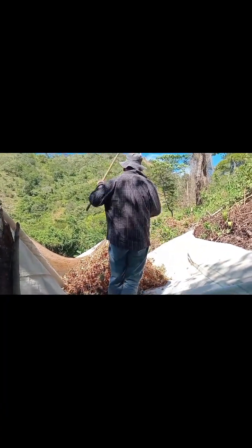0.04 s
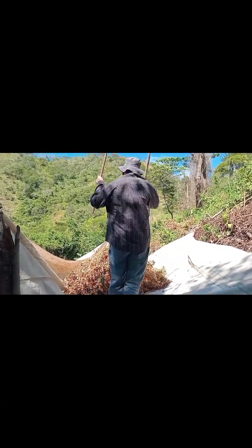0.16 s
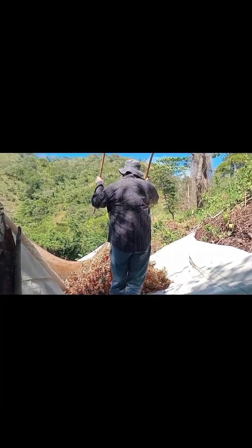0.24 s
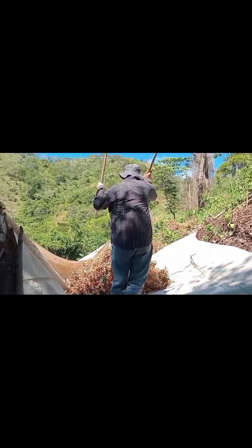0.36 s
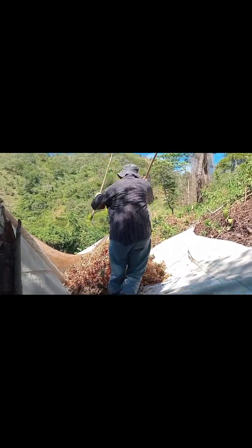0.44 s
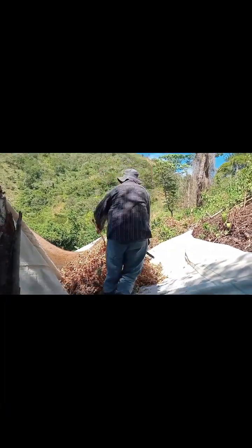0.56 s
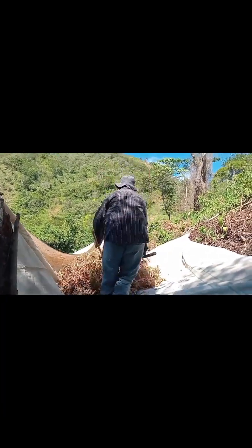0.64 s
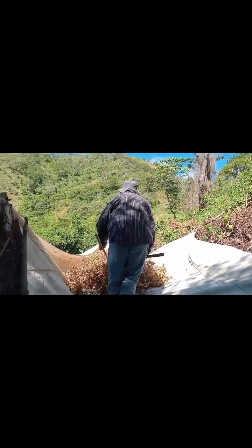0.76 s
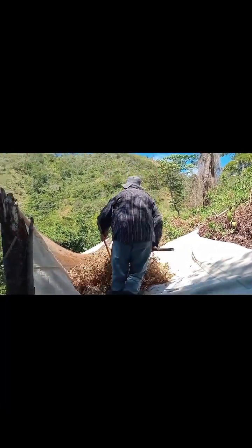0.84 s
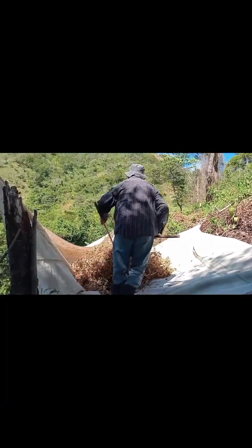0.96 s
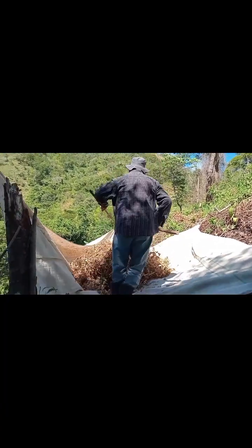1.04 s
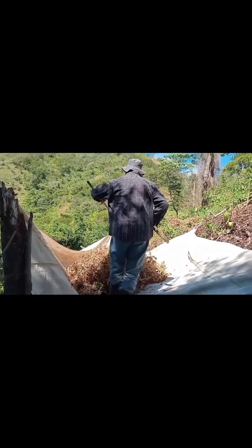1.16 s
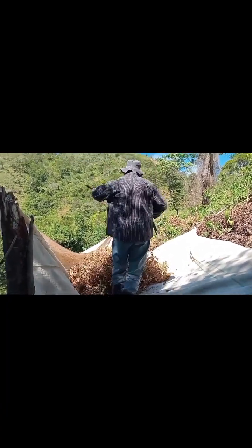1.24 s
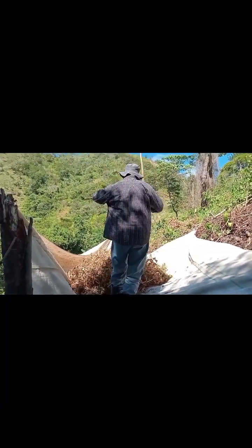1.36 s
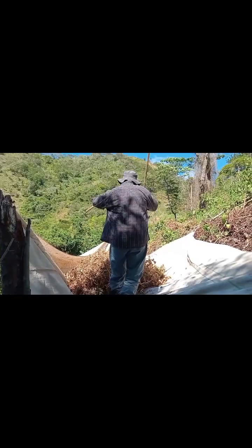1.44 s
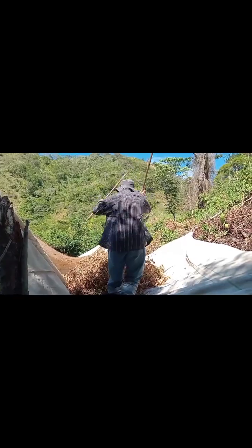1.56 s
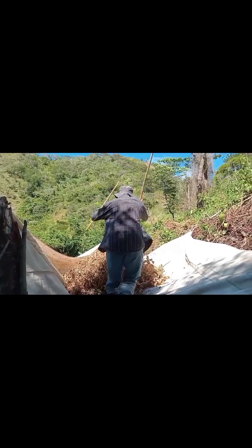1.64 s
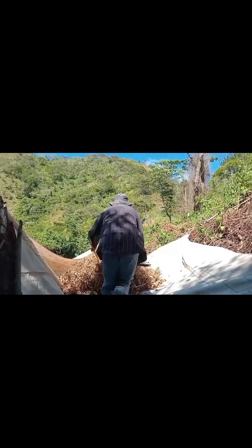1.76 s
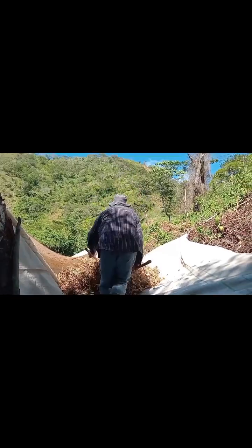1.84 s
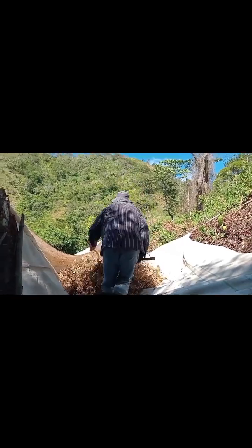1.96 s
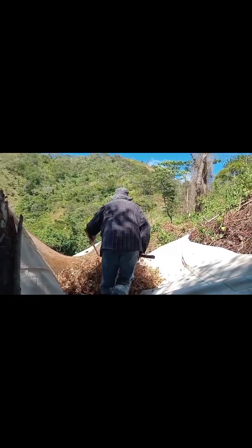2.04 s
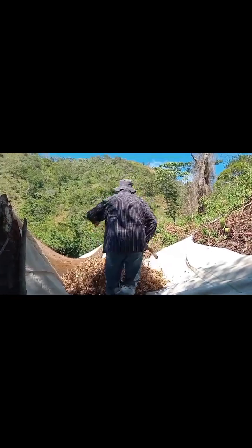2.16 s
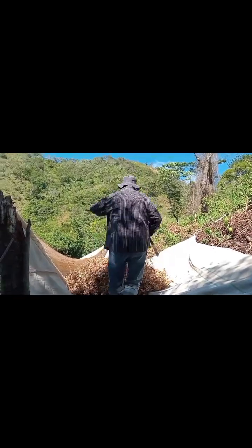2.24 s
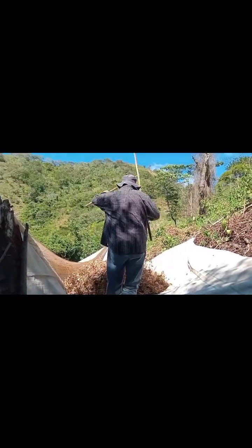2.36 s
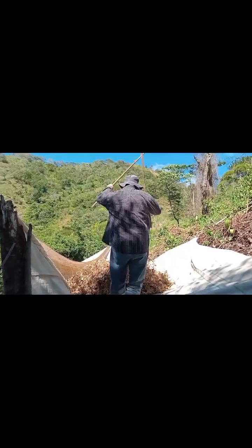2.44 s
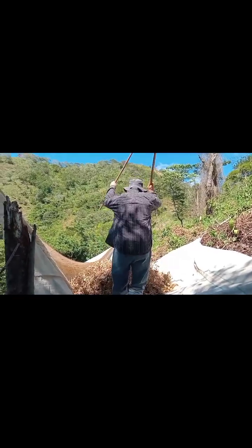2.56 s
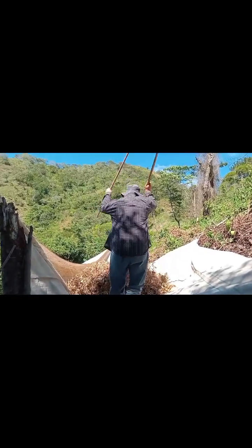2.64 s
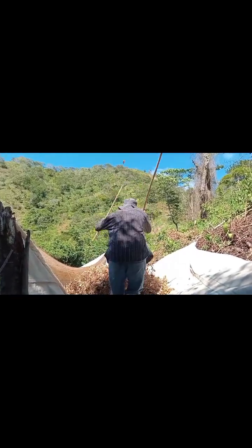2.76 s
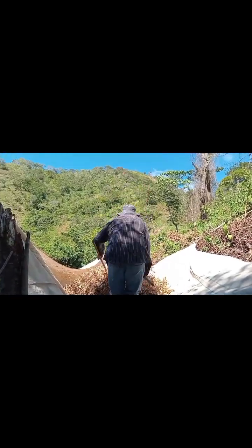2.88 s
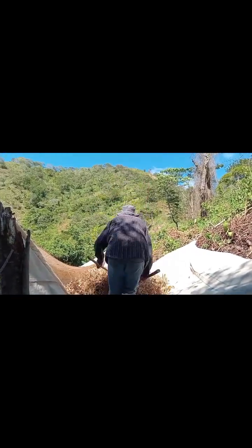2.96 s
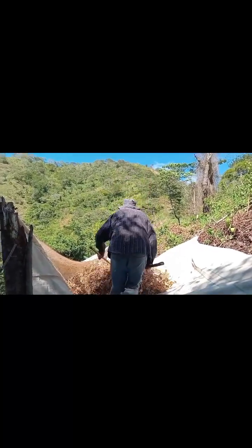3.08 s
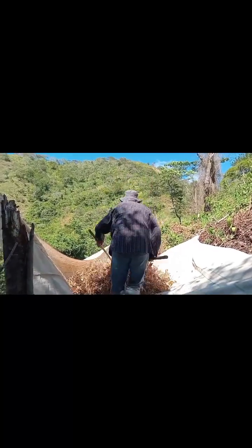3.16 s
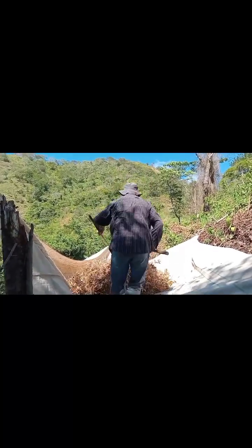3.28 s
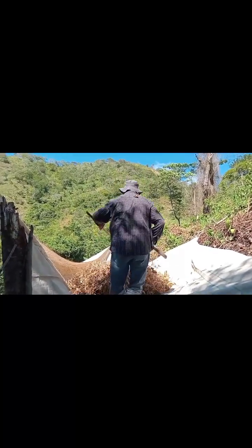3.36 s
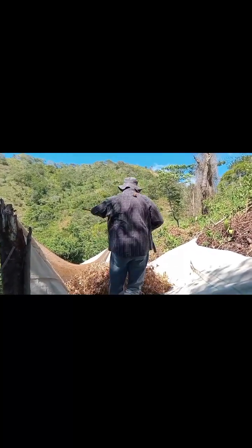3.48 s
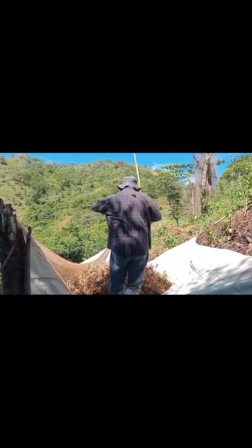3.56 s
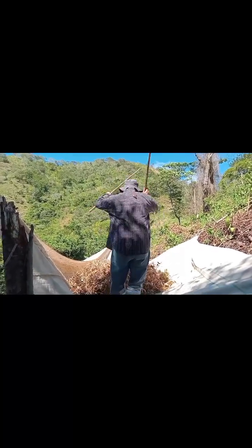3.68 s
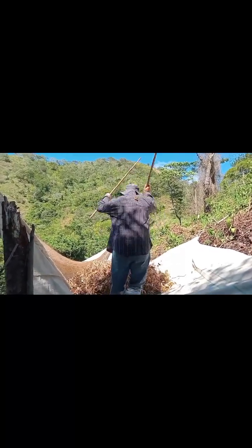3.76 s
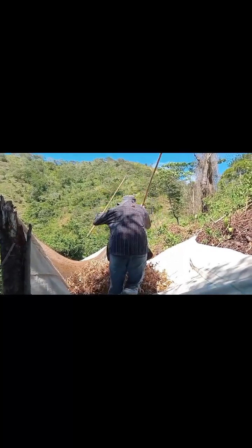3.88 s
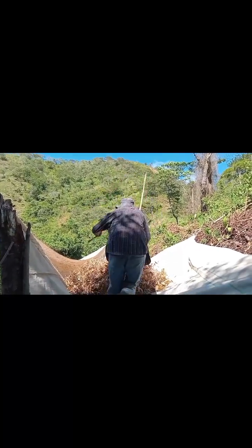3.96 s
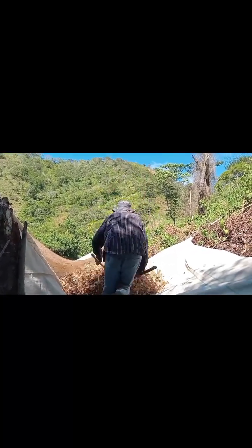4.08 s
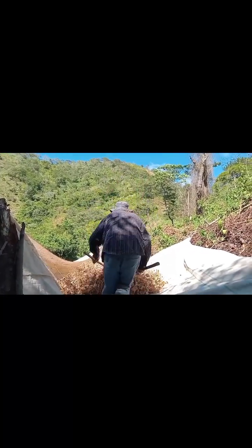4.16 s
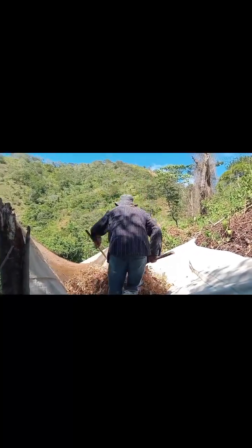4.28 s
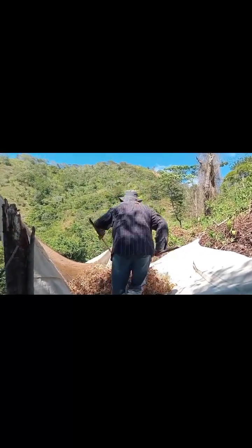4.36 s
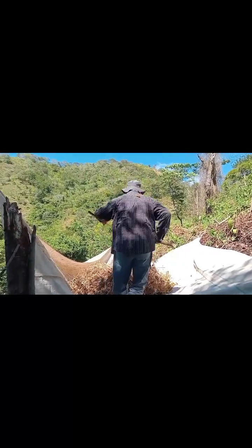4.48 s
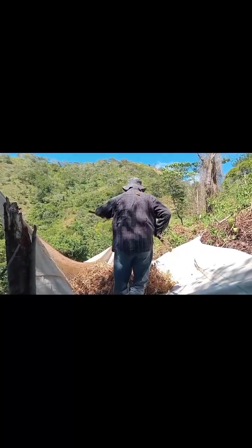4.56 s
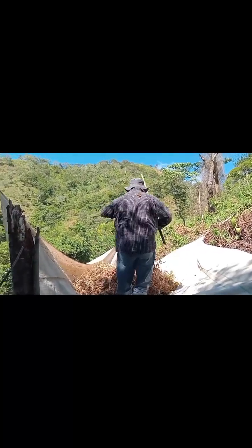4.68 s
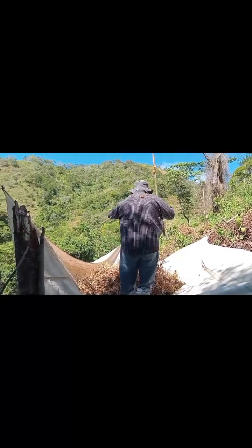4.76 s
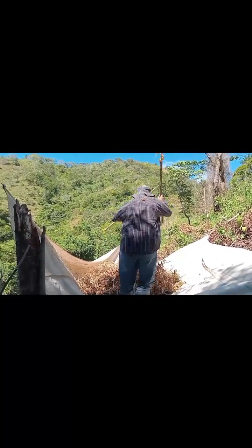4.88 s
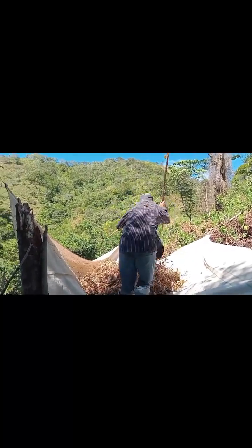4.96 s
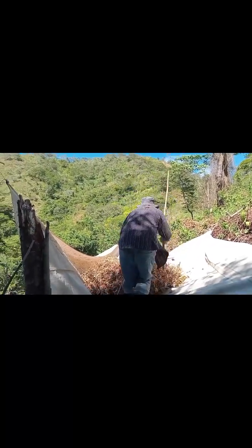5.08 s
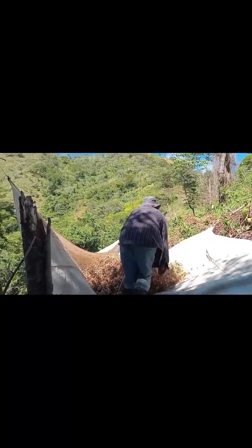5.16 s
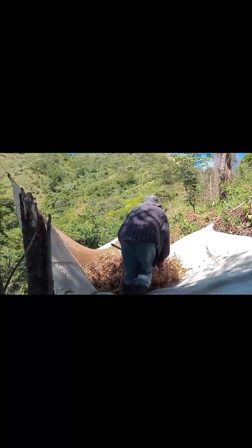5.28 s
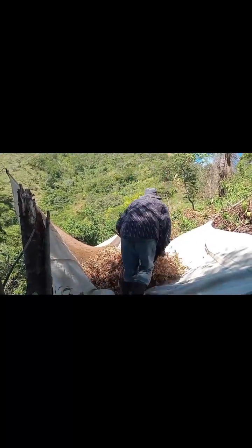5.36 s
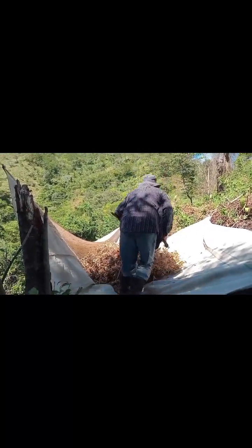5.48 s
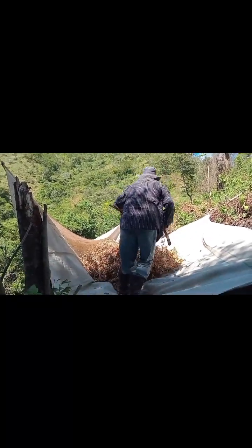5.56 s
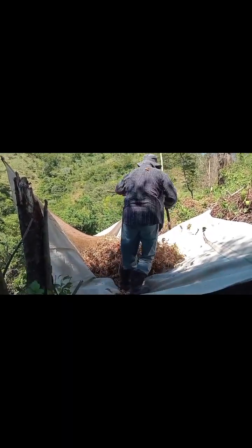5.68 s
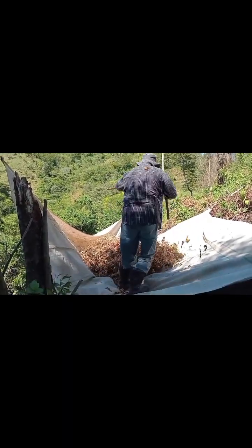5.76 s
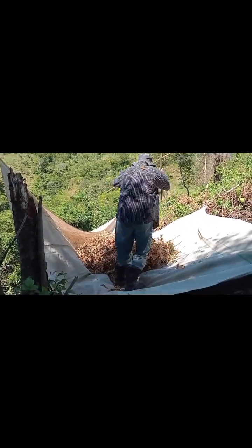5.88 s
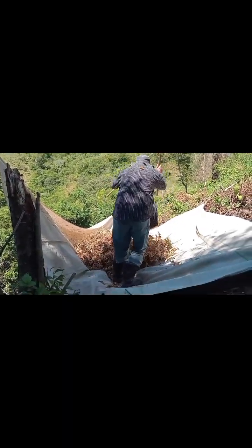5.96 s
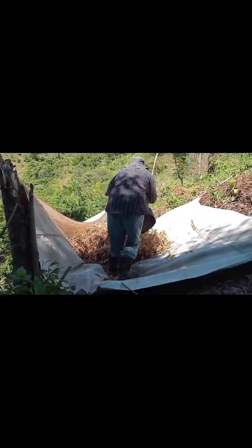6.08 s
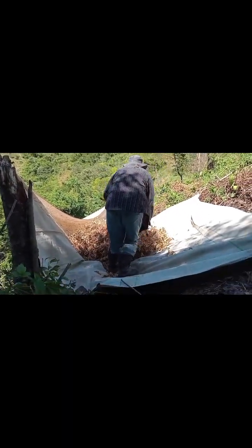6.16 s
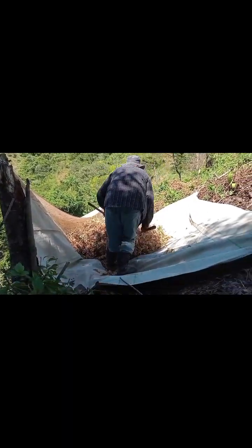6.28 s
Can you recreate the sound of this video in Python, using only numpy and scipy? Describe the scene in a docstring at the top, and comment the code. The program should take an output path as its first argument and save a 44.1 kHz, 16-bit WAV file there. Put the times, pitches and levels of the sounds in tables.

```python
"""A hillside outdoors: sticks thresh a pile of dry plants on a plastic tarp, heard by one microphone.
Each stroke swishes as a gliding tone, then lands as one to three close blows of shaped noise over damped thuds.
Pods and seeds crackle on down the sheet as coloured grains, with rustles, knocks, taps and short noise snaps.
A cricket trills steadily, a gliding tone cut into chirps with a faint echo, over softly swelling air noise."""
import sys
import numpy as np
from scipy import signal
from scipy.fft import rfft, irfft, next_fast_len
from scipy.io import wavfile
from scipy.ndimage import uniform_filter1d

SR = 44100
rng = np.random.default_rng(int(sys.argv[2]) if len(sys.argv) > 2 else 0)


def file_out(sig):
    """Save sig as 16-bit WAV at sys.argv[1]."""
    # one column per channel
    cols = np.atleast_2d(sig).T
    # limit, then scale
    lim = np.clip(cols, -1, 1)
    pcm = np.round(lim * 32767).astype(np.int16)
    wavfile.write(sys.argv[1], SR, pcm)


N = 278700  # length in samples

# colour of breaking stems and pods, relative: pitch_hz [Hz], level_db [dB per Hz]
CRACKLE_COLOUR = [(290, -52), (500, -14), (595, -37.5), (689, -10.5), (935, -7.5), (2140, 1.5), (3320, -6),
                  (3780, -3), (4630, -6), (6670, 2), (7280, -1), (8920, 4.5), (12500, -5), (15100, -8.5),
                  (16200, -26)]
# colour of the last fine seeds, relative: pitch_hz [Hz], level_db [dB per Hz]
TRICKLE_COLOUR = [(1880, -35.5), (3200, -23), (3420, -28), (3790, 4), (5450, -19.5), (9340, 3.5),
                  (12600, -17.5), (14100, -23.5), (16000, -24)]
# colour of the flapping tarp, relative: pitch_hz [Hz], level_db [dB per Hz]
FLAP_COLOUR = [(40, -6.5), (90, -3.5), (250, 3), (420, -0.5), (600, -12.5), (900, -18.5), (1500, -39.5)]
# stick landings: peak_s [s], crash_db [dB], rise_ms [ms], fall_ms [ms], stems_db [dB above the crash],
# thud_db [dB], thud_hz [Hz]
LANDINGS = [(0.555, -49, 5.2, 18, 4, -56, 170), (0.5722, -23.5, 18, 4.8, -9, -28, 170),
            (1.738, -27.5, 13.4, 8.7, -10, -49, 167.4), (1.7501, -21, 13.7, 6.5, -1, -21.5, 300),
            (2.847, -27, 1.8, 17, -4.5, -27, 148), (2.855, -27.5, 7.1, 9.6, -27, -36, 148.4),
            (2.8771, -18.5, 12.5, 10.4, -6.5, -17, 91.7), (3.935, -38, 8.2, 11, -14, -51.5, 250),
            (3.982, -25, 8, 9.6, -14, -33, 170), (3.9983, -20, 13, 14.5, -3.5, -17, 190),
            (5.1052, -20, 5.7, 4.2, -15.5, -40, 199), (5.118, -20.5, 11, 13, -9, -25, 130),
            (6.1448, -19.5, 11.6, 5.4, -10, -26.5, 151)]


def pile():
    """Dry plants: many small breaks crackle, scrape and rattle, blows blur into noise, and the tarp flaps."""
    level_db, pods_db, stems_db, flap_db = stirring()
    busy = np.clip((level_db + 69) / 18, 0, 1)  # as the pile settles only fine seeds keep running
    few = np.clip((-38 - level_db) / 20, 0, 1)  # few movers are patchy, many average out

    # stirred pile: dense breaks, plus single seeds heard apart once the pile calms
    ticks = evened(grains(70, 3, 0.02, count=9))
    breaks = evened(grains(5000, 0.42, 0.22, count=9)) + 0.5 * few * ticks
    breaks = patchy(breaks, 0.8 + 2.8 * few, 2, 16)
    stems, pods, crackle = thirds(coloured(breaks, CRACKLE_COLOUR))
    fine_seeds = thirds(coloured(breaks, TRICKLE_COLOUR))[2]
    crackle = busy * crackle + (1 - busy) * fine_seeds
    stems = (1 - few) * stems + few * hollow(stems)
    pods = (1 - few) * pods + few * hollow(pods)
    clumps = gain_of(0.7 * wander(5) + 1.3 * few * wander(30))  # seeds slide in bunches
    debris = crackle + pods * gain_of(pods_db) + stems * gain_of(stems_db)
    out = clumps * gain_of(level_db) * debris

    # blows: countless breaks at once blur into noise
    dense = coloured(patchy(rng.standard_normal(N), 0.63, 4.3, 3.6), CRACKLE_COLOUR)
    stems, pods, crackle = thirds(dense * gain_of(1.6 * wander(0.4)))
    for peak_s, crash_db, rise_ms, fall_ms, low_db, _, _ in LANDINGS:
        out += (crackle + 0.58 * pods) * crash(peak_s, crash_db, rise_ms, fall_ms)
        out += stems * crash(peak_s, crash_db + low_db, rise_ms, 1.14 * fall_ms)

    flap = coloured(patchy(rng.standard_normal(N), 3.5, 1, 8), FLAP_COLOUR)
    return out + flap * gain_of(level_db + flap_db + 1.8 * wander(20))


def crash(peak_s, db, rise_ms, fall_ms):
    """Amplitude of a landing: stems give way one after another from first touch, then settle."""
    ms = (np.arange(N) / SR - peak_s) * 1000
    rise = np.clip(1 + ms / rise_ms, 0, 1) ** 2.12
    fall = np.exp(-np.abs(ms) / fall_ms)
    return gain_of(db) * np.where(ms < 0, rise, fall)


# what each stroke sets moving: start_s [s], burst_db [dB], slide_db [dB], slide_fade [dB/s],
# slide_length_s [s], trickle_db [dB], pods_db and stems_db [dB above the crackle],
# flap_db [dB], flap_fade [dB/s]
STROKES = [(0.5728, -26.5, -35.5, 34.9, 0.53, -53, -9, -9.5, -50, 88),
           (1.7511, -27.5, -36, 43.2, 0.31, -55.5, -7, -9.5, -52, 62),
           (2.8772, -28, -33, 50.4, 0.49, -63.5, -7.5, -9.5, -43, 153),
           (3.9955, -26, -39, 30.03, 0.42, -65, -7, -9.5, -45.5, 92.7),
           (5.117, -27, -39.5, 32.8, 0.34, -67.5, -7, -12.5, -46.5, 132),
           (6.1428, -28.5, -51, 37.8, .4, -64, -5, -10, -48, 125)]
# stalks dragged by stick or foot between strokes: start_s [s], length_s [s],
# crackle_db, pods_db, stems_db, flap_db [dB]
RUSTLES = [(0.45, 0.094, -74, -79, -90, -85), (0.942, 0.098, -60, -61, -61, -76),
           (1.119, 0.12, -58, -68, -58.5, -59.5), (1.236, 0.12, -56, -67.5, -61, -63),
           (1.391, .04, -64.5, -77, -63.5, -60), (1.434, 0.12, -51.5, -65, -62, -66.5),
           (1.654, 0.071, -63, -69, -74, -74), (2.138, 0.076, -57.5, -67, -68, -79),
           (2.325, 0.038, -73, -90, -79, -77), (2.783, 0.016, -59, -77, -63, -82),
           (3.429, 0.014, -49, -52.5, -73, -86), (3.782, 0.012, -78, -80, -83.5, -94),
           (4.316, .09, -50.5, -55, -65, -98), (4.469, 0.027, -53.5, -66, -90, -90),
           (4.697, .025, -65, -80, -90, -101), (5.027, 0.1, -60.5, -89, -73, -63.5),
           (5.414, 0.056, -54, -54.5, -60, -73), (5.642, .09, -75, -83, -87, -78),
           (5.759, 0.067, -61.5, -70, -62.5, -65.5), (5.874, 0.022, -65, -71, -65, -91)]
# the pile at rest: crackle_db, pods_db, stems_db, flap_db [dB]
REST_LEVELS = (-85, -91, -85.5, -82)
# vortices behind the falling stick: start_s [s], end_s [s], first_hz [Hz], last_hz [Hz], level_db [dB]
# (here the stick's wind lifts the sheet; sticks() sounds the swish itself)
SWISHES = [(0.502, 0.562, 97, 186, -42.5), (1.712, 1.747, 140, 180, -35.5), (2.81, 2.87, 127, 190, -32),
           (3.945, 3.985, 150, 184, -38.5), (5.047, 5.099, 211.6, 300, -53), (6.1, 6.138, 165, 206, -40.5)]
HOLD_S = 0.011  # each stroke holds its level this long before fading
BURST_DB_PER_S, STOP_DB_PER_S, TRICKLE_DB_PER_S = 104, 102, 10  # fades
TRICKLE_PODS_DB, TRICKLE_STEMS_DB, TRICKLE_FLAP_DB = -15, -14, -29.5  # above the trickle's crackle
DRAG_RISE_S, DRAG_DB_PER_S = 0.017, 303
SWISH_FLAP_DB = -22.5  # above the swish


def stirring():
    """A stroke starts a burst, a slide that stops and a trickle; drags add short rustles. Powers add."""
    t = np.arange(0, N + 16, 16) / SR  # a level every 16 samples
    power = power_of(REST_LEVELS)[:, None] * np.ones(len(t))  # rows: crackle, pods, stems, flap
    ends = [row[0] for row in STROKES[1:]] + [np.inf]  # each stroke gives way to the next
    for stroke, end_s in zip(STROKES, ends):
        start_s, burst_db, slide_db, slide_fade, slide_length_s = stroke[:5]
        trickle_db, pods_db, stems_db, flap_db, flap_fade = stroke[5:]
        on = (t >= start_s) & (t < end_s)
        u = np.maximum(t[on] - start_s - HOLD_S, 0)
        slide_db = slide_db - slide_fade * np.minimum(u, slide_length_s)
        slide_db = slide_db - STOP_DB_PER_S * np.maximum(u - slide_length_s, 0)
        moving = power_of(burst_db - BURST_DB_PER_S * u) + power_of(slide_db)
        trickle = power_of(trickle_db - TRICKLE_DB_PER_S * u)
        flap = power_of(flap_db - flap_fade * u)
        power[:, on] += [moving + trickle,
                         moving * power_of(pods_db) + trickle * power_of(TRICKLE_PODS_DB),
                         moving * power_of(stems_db) + trickle * power_of(TRICKLE_STEMS_DB),
                         flap + trickle * power_of(TRICKLE_FLAP_DB)]
    for start_s, length_s, *levels_db in RUSTLES:
        rise = np.clip((t - start_s) / DRAG_RISE_S, 0, 1)
        fall = gain_of(-DRAG_DB_PER_S * np.maximum(t - start_s - length_s, 0))
        power += power_of(levels_db)[:, None] * (rise * fall) ** 2
    for start_s, end_s, *_, db in SWISHES:
        lift = np.interp(t, [start_s, end_s, end_s + 0.032], [0, 1, 0])
        power[3] += (gain_of(db + SWISH_FLAP_DB) * lift) ** 2
    level_db = np.array([np.interp(np.arange(N) / SR, t, 10 * np.log10(p)) for p in power])
    return level_db[0], *(level_db[1:] - level_db[0])  # the last three relative to the crackle


# hollow stems and pods that colour the slow sliding, its lows thinned:
# pitch_hz [Hz], width_hz [Hz], level_db [dB]
HOLLOWS = [(740, 380, -5), (1270, 160, 6.5), (2207, 240, 6.5), (3990, 83, 4), (4660, 300, 2.5)]


def hollow(x):
    """Shapes x by the resonances of the hollow stems and pods, at rms 1."""
    hz = np.geomspace(300, 16000, 300)
    db = sum(peak_db * np.exp(-((hz - f) / width) ** 2) for f, width, peak_db in HOLLOWS)
    return coloured(x, np.transpose([hz, db]))


# where the pods' range starts and ends: low_hz, high_hz [Hz]
PODS_RANGE = (2900, 5700)


def thirds(x):
    """Splits into stems, pods and crackle ranges, low to high, each at rms 1."""
    filters = [signal.butter(3, hz, fs=SR, output="sos") for hz in PODS_RANGE]
    below_pods, below_crackle = (signal.sosfiltfilt(sos, x) for sos in filters)
    return evened(below_pods), evened(below_crackle - below_pods), evened(x - below_crackle)


# dull knocks of stick or boot on the sheet: start_s [s], level_db [dB], pitch_hz [Hz]
KNOCKS = [(0.478, -45, 53.7), (.65, -38.5, 705), (0.679, -38, 406), (0.7, -36, 370), (.705, -35, 716),
          (.79, -50.5, 352), (0.928, -49, 390), (1.125, -46, 880), (1.149, -60, 615), (1.19, -44, 225),
          (1.321, -44.5, 337), (1.442, -47.5, 324), (1.509, -47.5, 406), (1.844, -33, 330),
          (1.845, -31.5, 715), (4.041, -35, 211), (5.04, -49, 270)]
# wood touching wood: start_s [s], level_db [dB], tilt_db [dB/octave towards the high modes]
TAPS = [(1.1088, -27.5, 22), (1.129, -33.5, 10), (1.68, -45, 18), (5.039, -30.5, -1.5), (5.768, -46.5, 7)]
# modes of the wooden stick: pitch_hz [Hz], level_db [dB]
STICK_MODES = [(1350, 2), (1820, 0.5), (2250, 2.5)]
GROUND_HZ, GROUND_DB = 64.6, -17  # the ground's push, level above the thud
TAP_CYCLES, TAP_RISE_CYCLES = 2.6, 2.0


def sticks():
    """Falling sticks shed a gliding tone; landings, knocks and taps are short damped swings."""
    out = np.zeros(N)
    for start_s, end_s, first_hz, last_hz, db in SWISHES:
        u = np.linspace(0, 1, round((end_s - start_s) * SR))
        hz = first_hz + (last_hz - first_hz) * u
        turns = np.cumsum(hz) / SR + rng.random()
        swell = u ** 1.3 * signal.windows.tukey(len(u), 0.4)
        add(out, start_s, gain_of(db) * swell * np.sin(2 * np.pi * turns))
    for peak_s, *_, thud_db, thud_hz in LANDINGS:
        add(out, peak_s - 0.003, ring(thud_hz, thud_db, 0.47))
        add(out, peak_s - 0.001, ring(GROUND_HZ, thud_db + GROUND_DB, 1.0))
    for start_s, db, hz in KNOCKS:
        add(out, start_s, ring(hz, db, 1.45 + hz / 1200))
    for start_s, db, tilt_db in TAPS:
        for hz, mode_db in STICK_MODES:
            tilted_db = db + mode_db + tilt_db * np.log2(hz / STICK_MODES[-1][0])
            add(out, start_s, ring(hz, tilted_db, TAP_CYCLES, TAP_RISE_CYCLES))
    return out


def ring(hz, db, cycles, rise=0.27):
    """A softly started, quickly damped swing; rise and decay are counted in cycles."""
    u = np.arange(int(6 * cycles * SR / hz)) * hz / SR
    start = 1 - np.exp(-(u / rise) ** 1.8)
    return gain_of(db) * start * np.exp(-u / cycles) * np.sin(2 * np.pi * u)


# single pods and stems that snap: start_s [s], level_db [dB], brightest_hz [Hz]
SNAPS = [(0.8948, -35.5, 6200), (0.973, -35, 6700), (1.1101, -39.5, 4340), (1.126, -41.5, 7400),
         (1.214, -48, 8400), (1.254, -42, 9500), (1.339, -48, 8500), (1.466, -36.5, 8900),
         (1.4864, -37.5, 8200), (1.5265, -44, 7850), (1.6727, -41.5, 9600), (1.682, -44, 4530),
         (2.258, -53, 4000), (2.332, -48, 10200), (2.358, -47, 9900), (2.483, -51.5, 10300),
         (2.566, -51, 9600), (2.656, -55, 9250), (2.6857, -61, 9800), (2.7833, -60, 9600),
         (3.3278, -47, 9800), (3.4431, -38, 10100), (3.672, -55.5, 7000), (3.795, -47, 8800),
         (4.2424, -50.5, 9520), (4.2584, -50, 9770), (4.489, -41.5, 7760), (4.632, -58, 8500),
         (4.7069, -48.5, 9340), (4.881, -50, 9900), (5.766, -52.5, 4870), (5.7994, -52, 5200),
         (5.843, -57, 9800), (5.879, -58, 4130), (5.9044, -56.5, 4960), (5.917, -59, 4900),
         (5.919, -59, 9400)]
SNAP_OCTAVES, SNAP_WIDENS_PER_DB = 0.24, 0.07  # harder snaps cover more pitch


def snaps():
    """Each snap is a millisecond noise burst around its brightest pitch, with a short scatter."""
    out = np.zeros(N)
    t = np.arange(800) / SR
    fade = np.exp(-t / 0.0014) + 0.25 * np.exp(-t / 0.008)
    hz_axis = np.fft.rfftfreq(800, 1 / SR) + 1
    for start_s, db, brightest_hz in SNAPS:
        width = SNAP_OCTAVES * np.exp(SNAP_WIDENS_PER_DB * (db + 42))
        octaves = np.log2(hz_axis / brightest_hz) / width
        lopsided = octaves / np.where(octaves > 0, 0.7, 1.3)  # steeper above than below
        burst = rfft(rng.standard_normal(800)) * np.exp(-lopsided ** 2)
        add(out, start_s, gain_of(db) * evened(irfft(burst, 800)) * fade)
    return out


# the trill's pace and strength, marked at every sixth chirp: time_s [s], level_db [dB]
TRILL = [(-0.116, -56), (0.226, -53.5), (0.565, -59), (0.915, -58.5), (1.248, -54.5), (1.584, -54.5),
         (1.925, -52.5), (2.265, -53), (2.615, -52), (2.955, -54.5), (3.297, -51.5), (3.641, -51.5),
         (3.985, -55), (4.336, -52), (4.689, -53), (5.039, -52.5), (5.385, -54), (5.739, -57.5),
         (6.097, -57), (6.454, -60.5)]
WING_HZ = 2672  # the glide and a slight waver move around it
SIDE_MODE, SIDE_SHARE = 1.215, 0.045  # a faint second wing mode: pitch ratio and amplitude share


def cricket():
    """Wing strokes of a pure note that glides up a little; a faint echo fills the gaps."""
    s, db = np.transpose(TRILL)
    t = np.arange(N) / SR
    strokes = np.interp(t, s, 6 * np.arange(len(s))) + 0.04 * wander(60)
    part = (strokes + 0.5) % 1 - 0.5  # -0.5..0.5 around the middle of a chirp
    shape = np.exp(-(np.abs(part) / 0.2) ** 5.1) * np.exp(-1.2 * part)
    hz = WING_HZ + 130 * np.clip(part, -0.3, 0.1) + 8 * wander(40)
    turn = 2 * np.pi * np.cumsum(hz) / SR
    tone = np.sin(turn) + SIDE_SHARE * np.sin(SIDE_MODE * turn)
    note = shape * gain_of(np.interp(t, s, db) + 1.3 * wander(30)) * tone
    echo_tail = rng.standard_normal(6000) * np.exp(-np.arange(6000) / SR / 0.044)
    echo_tail /= np.linalg.norm(echo_tail)
    return note + gain_of(-9.5) * signal.oaconvolve(note, echo_tail)[:N]


# colour of the hillside air, relative: pitch_hz [Hz], level_db [dB per Hz]
AIR_COLOUR = [(12, -45.5), (20, -15), (68, -7), (168, -19.5), (485, -30), (873, -21.5), (1090, -29.5),
              (2200, -24.5), (3070, -30), (6000, -34), (9400, -35.5), (12000, -42.5), (16000, -51)]
AIR_DB = -75.5  # level around which it swells


def air():
    """Distant leaves and low wind: coloured noise, swelling gently."""
    swell = gain_of(AIR_DB + 1.0 * wander(120))
    return swell * coloured(rng.standard_normal(N), AIR_COLOUR)


def grains(per_s, spread_db, wide_share, count):
    """Tiny breaks of uneven size; some excite one band of pitch, some all of them. Flat on average."""
    size = next_fast_len(N)

    def train():
        """Spectrum of one random train of clicks."""
        sizes = gain_of(spread_db * np.minimum(rng.exponential(1, N), 5))
        hits = rng.random(N) < per_s / SR
        return rfft(sizes * rng.standard_normal(N) * hits, size)

    log_hz = np.log(np.fft.rfftfreq(size, 1 / SR) + 1)
    place = np.interp(log_hz, np.log([600, 15000]), [0, count - 1])
    share = np.clip(wide_share, 0, 1)
    z = np.sqrt(share) * train()
    for k in range(count):  # overlapping bands whose powers sum to one
        band = np.cos(np.pi / 2 * np.clip(place - k, -1, 1))
        z = z + np.sqrt(1 - share) * train() * band
    return irfft(z, size)[:N]


def patchy(x, db, bins, frames):
    """Lets patches of pitch swell and fade by the depth curve db, as different parts of the pile move."""
    _, s, z = signal.stft(x, SR, nperseg=512, noverlap=384)
    field = rng.standard_normal(z.shape[::-1]).T
    for _ in range(2):
        field = uniform_filter1d(field, max(int(bins), 1), 0)
        field = uniform_filter1d(field, max(int(frames), 1), 1)
    depth = np.interp(s, np.arange(N) / SR, db * np.ones(N)) * np.log(10) / 20
    z = z * np.exp(depth * evened(field) - depth ** 2)  # the mean power stays
    return signal.istft(z, nperseg=512, noverlap=384)[1][:len(x)]


def wander(ms):
    """Slow chance of rms 1 that changes over about ms."""
    width = max(int(ms * SR / 1000), 1)
    smooth = uniform_filter1d(rng.standard_normal(N), width)
    return evened(uniform_filter1d(smooth, width))


def coloured(x, points):
    """Filters x by the curve drawn through (Hz, dB) points, at rms 1."""
    f, db = np.transpose(points)
    size = next_fast_len(len(x))
    hz = np.fft.rfftfreq(size, 1 / SR)
    curve = gain_of(np.interp(np.log(hz + 1), np.log(f + 1), db))
    return evened(irfft(rfft(x, size) * curve, size)[:len(x)])


def evened(x):
    """Scales to rms 1."""
    return x / np.sqrt(np.mean(x ** 2) + 1e-30)


def gain_of(db):
    """Decibels to amplitude."""
    return 10 ** (np.asarray(db) / 20)


def power_of(db):
    """Decibels to power."""
    return gain_of(2 * np.asarray(db))


def add(mix, s, sound):
    """Mixes a sound in at time s."""
    part = mix[round(s * SR):][:len(sound)]
    part += sound[:len(part)]


def scene():
    """Everything reaches one microphone, copied to two equal channels."""
    mono = pile() + sticks() + snaps() + cricket() + air()
    return np.tile(mono, (2, 1))


EDGE_HZ = 16100  # upper band limit


def record(dry):
    """The band limit: a steep low-pass."""
    lowpass = signal.firwin(511, EDGE_HZ, window=("kaiser", 9), fs=SR)
    return signal.oaconvolve(dry, lowpass[None], "same")


dry = scene()
out = record(dry)
file_out(out)
```